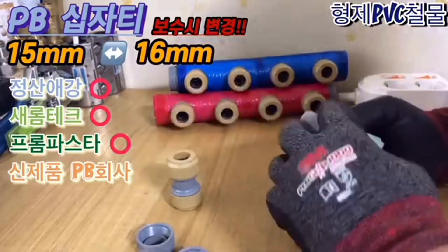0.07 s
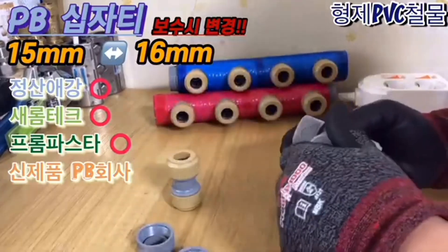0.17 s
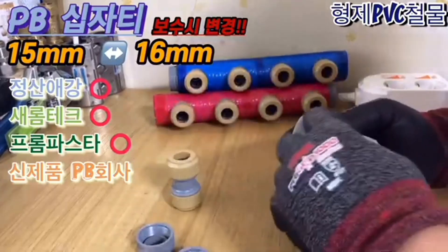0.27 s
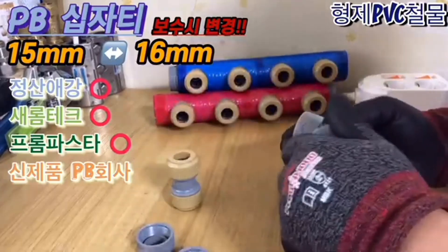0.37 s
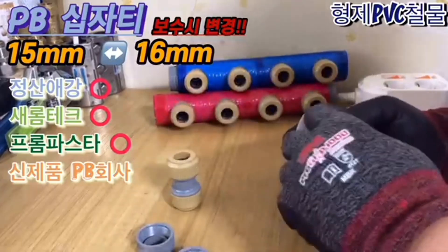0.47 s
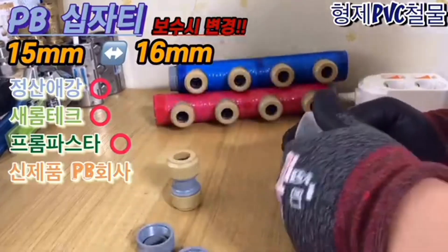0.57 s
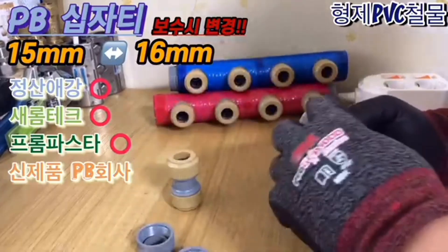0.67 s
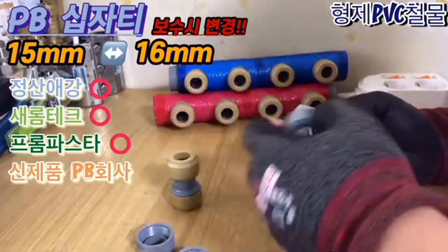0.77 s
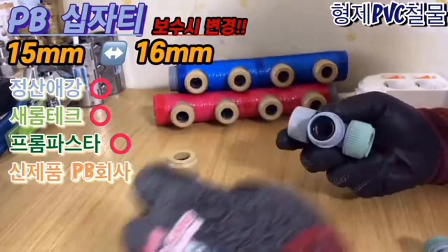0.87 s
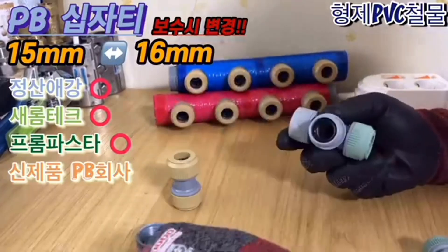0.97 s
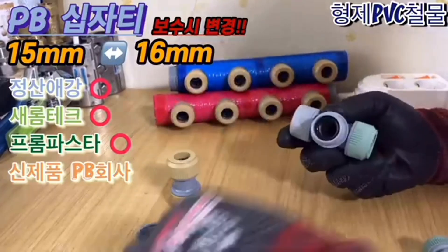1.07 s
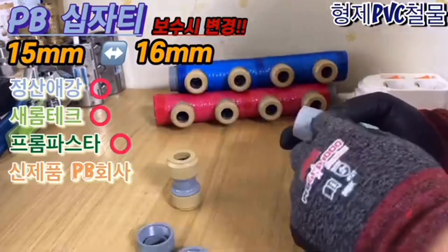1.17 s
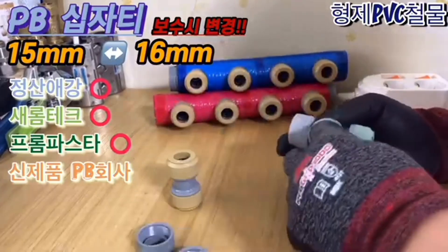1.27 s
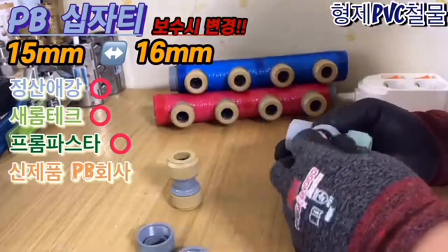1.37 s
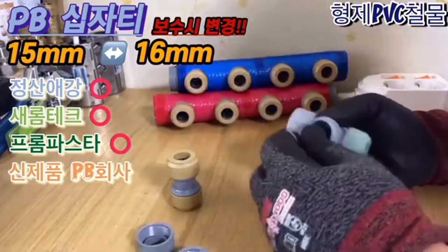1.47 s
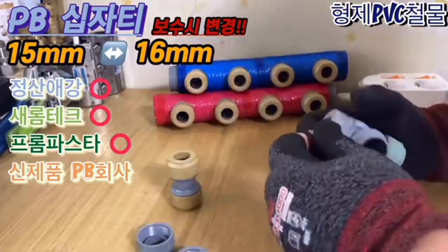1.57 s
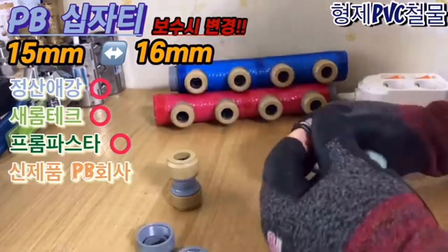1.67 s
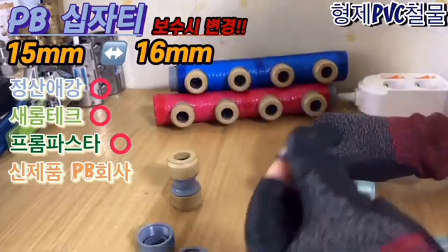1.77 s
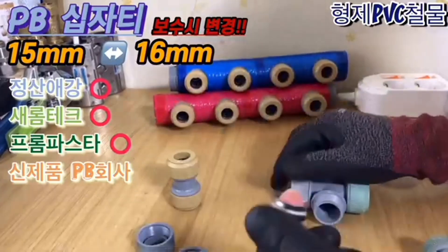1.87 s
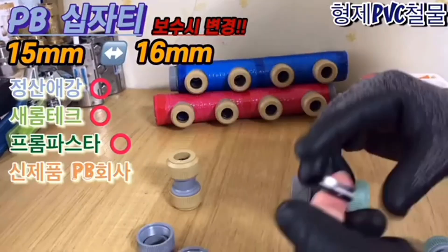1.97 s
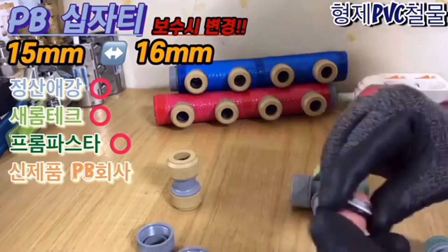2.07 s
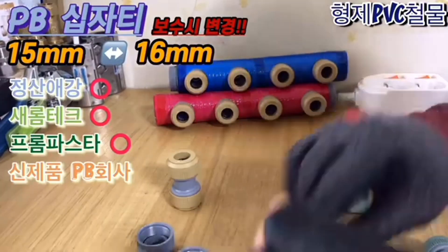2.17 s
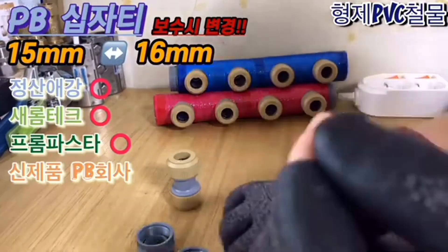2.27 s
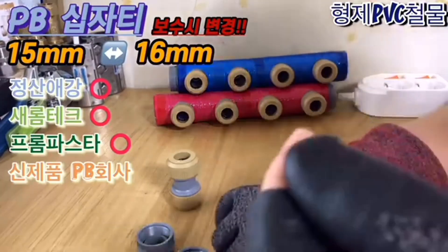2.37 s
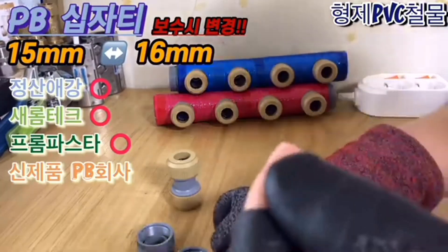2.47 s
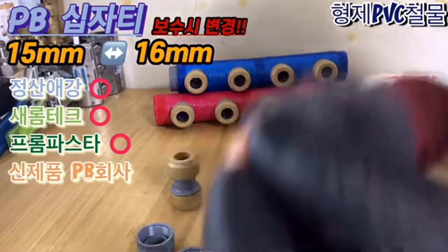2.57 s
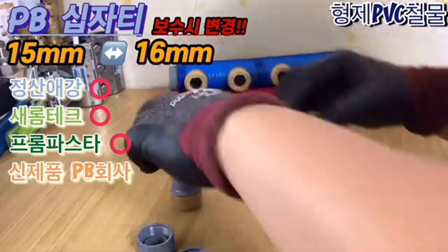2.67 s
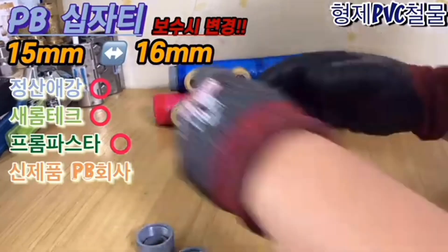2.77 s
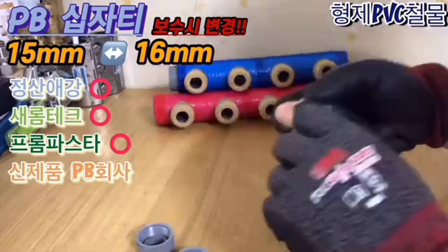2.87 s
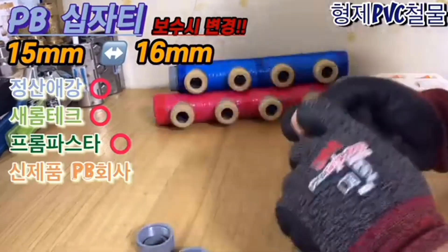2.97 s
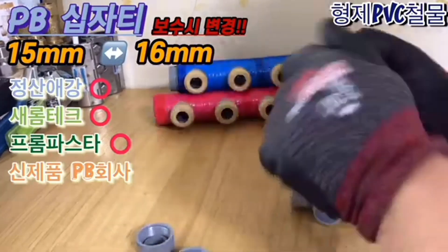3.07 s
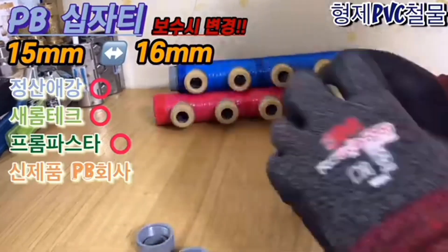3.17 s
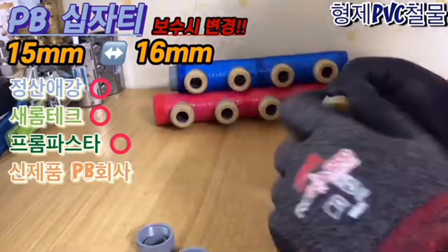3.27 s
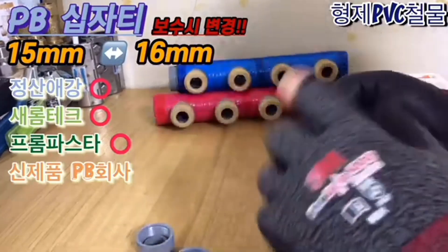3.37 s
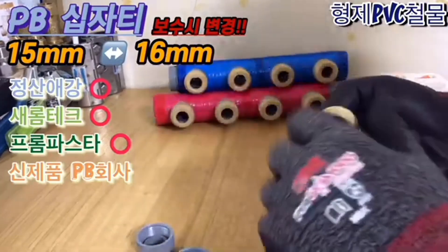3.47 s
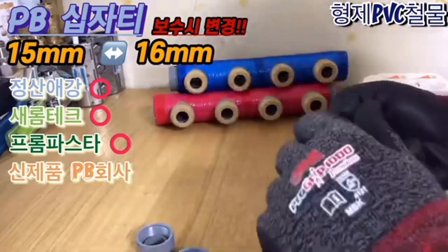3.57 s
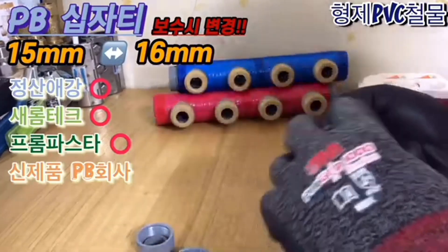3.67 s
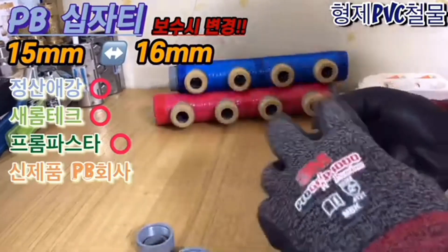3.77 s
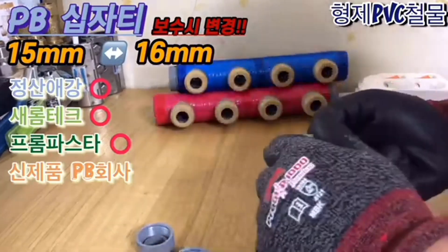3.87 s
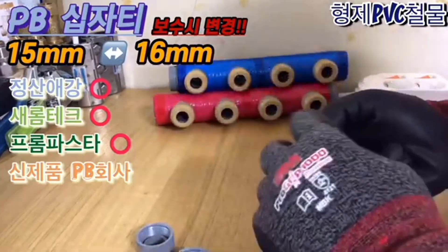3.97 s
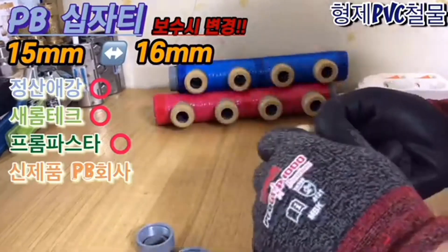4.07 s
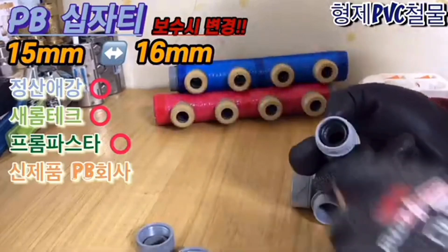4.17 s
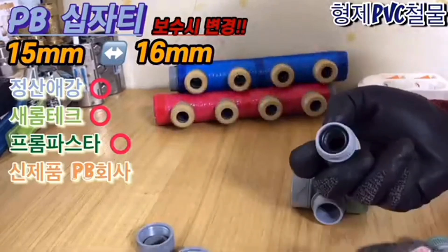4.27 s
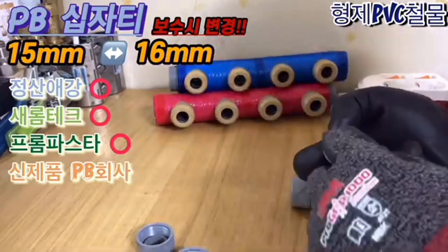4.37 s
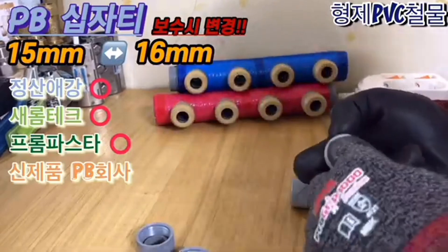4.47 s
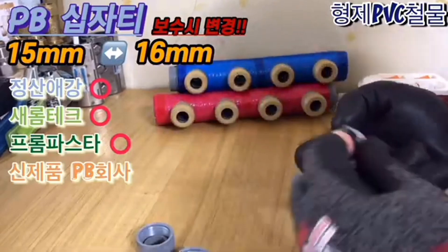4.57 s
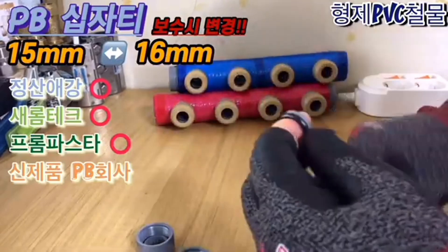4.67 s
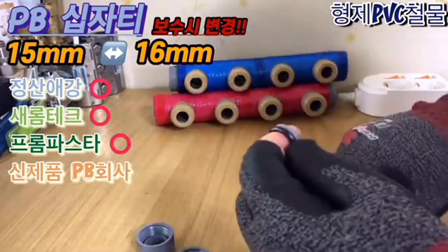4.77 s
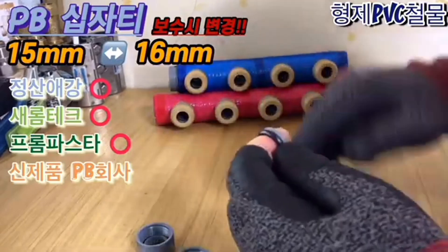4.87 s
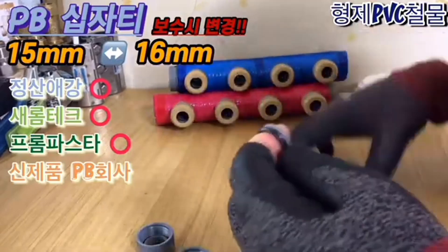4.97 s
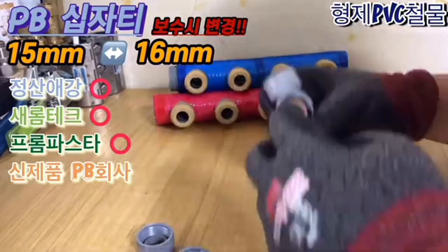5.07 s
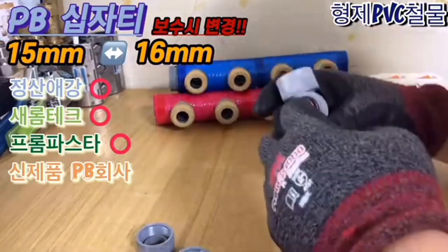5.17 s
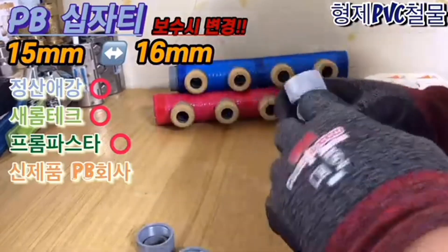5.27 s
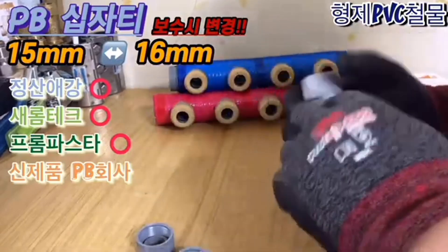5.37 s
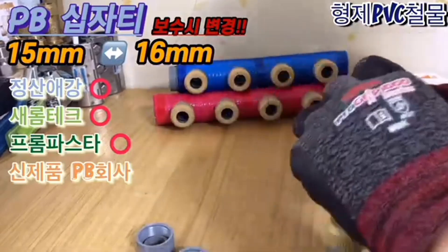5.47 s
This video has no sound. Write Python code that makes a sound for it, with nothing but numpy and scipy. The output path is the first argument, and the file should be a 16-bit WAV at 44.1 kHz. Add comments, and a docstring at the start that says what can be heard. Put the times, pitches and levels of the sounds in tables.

```python
"""Plastic pipe fittings pushed together

Gloved hands push light plastic pipe fittings together over a wooden table in a small room.
Each knock rings the air in the bore and the plastic walls; parts slide on each other with many tiny
contacts. Gloves rustle as filtered grains, and a machine hums softly as noise through resonances.
Echoes and steady room noise fill the rest."""
import sys
import numpy as np
from scipy import signal
from scipy.fft import rfft, irfft
from scipy.io import wavfile

SR = 44100
rng = np.random.default_rng(int(sys.argv[2]) if len(sys.argv) > 2 else 0)


def materialize(psi):
    """Save the field psi as 16-bit PCM at rate SR to the path in sys.argv[1].

    A 1-D psi becomes a single channel; in a 2-D psi each row is a channel.
    """
    bounded = np.clip(np.atleast_2d(psi).T, -1, 1)
    quanta = np.round(bounded * 32767).astype(np.int16)
    wavfile.write(sys.argv[1], SR, quanta)


N = 242991

# strongly damped ways the plastic walls ring: pitch_hz [Hz], level_db [dB],
# t60_s [s to fall by 60 dB; ringing() uses 2 ms or more]
WALLS = [(1560, -25, 0.0041), (1901, -8.5, 0.023), (2300, 0.5, 0.0014), (2940, -3, 0.0075),
         (3474, -2.5, 0.0086), (3830, -0.5, 0.0067), (4620, -4, 0.0084), (5750, 4, 0.0017),
         (6060, 0, 0.006), (6830, 5.5, 0.0019), (8080, 4.5, 0.0011), (9530, 3.5, 0.0018), (10080, 5, 0.003),
         (10920, 2, 0.0013), (12770, -3.5, 0.0035), (14100, -9.5, 0.0015)]

HISS_TOP_HZ = 15000   # no part modes or coloured noise from here up
FIRM_MS = 0.025   # contact time of a firm knock


def knocks():
    """A blow builds up to its main contact, dies in a chatter of small ones, and rings what it hits."""
    # knocks: start_s [s], peak_db [dB], bore_hz [Hz], bore_db [dB], part_hz (touched part) [Hz],
    # part_db [dB], overtone_db [dB], contact_ms [ms], wall_tilt [dB per octave], table_db (thud) [dB]
    knock_rows = [(0.2002, -44.5, 1590, -11, 8190, -9, -15, .03, 14, -27),
                  (.2152, -42.5, 2340, -1, 3080, 0, -9, 0.021, 5.5, -27),
                  (0.5456, -41.5, 1610, -30, 4780, 1, -10, 0.024, 1, -29),
                  (0.9602, -27, 2300, 9, 2800, -3, -12, 0.022, -6, -31),
                  (0.9636, -22.5, 1770, 3, 3170, 10, -20, 0.023, -21, -26),
                  (0.9808, -15.5, 2110, 10, 2830, -14, 0.5, 0.021, -4, -37),
                  (1.0077, -37.5, 2270, 3, 2700, -6, -1, 0.029, -0.5, -31),
                  (1.3796, -45, 2180, -7, 9900, 5, -15, 0.048, 15, -27),
                  (1.5364, -47.5, 1508, -6, 8840, -2, -15, .026, 16, -27),
                  (1.692, -18, 1390, 8.5, 2560, -1, -5, 0.093, 7.5, -21),
                  (1.699, -28.5, 1490, 14, 2600, -6, -15, 0.066, 4, -16.5),
                  (1.776, -18.5, 1430, -1, 2570, 9, -13, 0.061, 2, -29),
                  (1.7971, -13.5, 2190, 7, 3015, 5, 3, 0.035, 3, -16),
                  (1.8009, -13, 1294, 0.5, 2503, 8, -2.5, 0.045, -0.5, -20.5),
                  (1.8027, -21.5, 1800, 5.5, 2430, -18, -20, 0.057, -3.5, -18.5),
                  (2.112, -23, 1590, -2, 2400, 7.5, -14, 0.055, 5.5, -17),
                  (2.1211, -24.5, 1480, -1, 2400, 0, -14, 0.063, -24, -19),
                  (2.168, -27, 1450, 10, 2430, 3, -15, 0.079, 3, -14.5),
                  (2.189, -43, 1560, -1, 2340, 2, -9, 0.042, 4, -27),
                  (2.3092, -46.5, 1520, -5, 7400, -5, -15, .027, 11, -27),
                  (2.4291, -39.5, 1570, 3, 8000, 12.5, -12, 0.016, 7, -27),
                  (2.6725, -28.5, 1630, 3, 2400, 13.5, -9, 0.057, -4, -29),
                  (3.0085, -10.5, 2100, 1.5, 4870, 17, 0, .025, 13, -29),
                  (3.0818, -46.5, 1500, 1, 3690, 3, -9, .03, -1, -33),
                  (3.1808, -26.5, 1710, -18, 3490, 22, -1, 0.0066, 18.5, -27),
                  (3.261, -41, 2160, -5, 2900, 1, 7, 0.027, 8, -27),
                  (3.359, -34, 1650, -10, 3800, 17, -3, 0.016, 15.5, -27),
                  (3.4915, -43, 1530, -8, 3630, 11, -6, 0.017, -1, -27),
                  (3.746, -41, 2330, 1, 3800, 11, -6, .027, 12, -29),
                  (3.9074, -38, 1670, -17, 3840, 2.5, -6, 0.022, 9, -28),
                  (4.2075, -34.5, 1720, 21, 2270, -7, -13, 0.046, 0, -30),
                  (4.2292, -15, 1890, -1, 3280, -2, 7, 0.023, 5.5, -40),
                  (4.2398, -12, 1680, 4.5, 3210, 4, 9.5, 0.026, 9.5, -36),
                  (4.2451, -27, 1530, 1, 2490, 1, -7, 0.035, 7, -35),
                  (4.3393, -46.5, 1450, -8, 4430, 12, -9, 0.044, 0, -29),
                  (4.6438, -11.5, 1716, 7, 2700, -3, -1, 0.046, 5.5, -26.5),
                  (4.6493, -26, 1950, 7, 2590, -18, -5, 0.062, -5, -30),
                  (4.7664, -37.5, 1590, -2, 2550, -7, -9, 0.077, -12, -25),
                  (4.784, -35.5, 2100, -4, 2490, -5, -3.5, 0.04, -3.5, -16.5),
                  (4.9544, -22, 1330, 1.5, 2470, 0.5, -4.5, 0.037, -3, -29),
                  (4.9826, -30.5, 1920, 2, 2780, -6, -9, 0.015, -11, -33),
                  (5.1038, -47.5, 1600, -3, 9600, -2, -17, .027, 17, -31),
                  (5.226, -40, 1630, -3, 4000, 9, -9, .042, 12.5, -25),
                  (5.257, -42.5, 1490, -9, 4170, 21, -6, .021, 12.5, -27)]
    # table top modes: pitch_hz [Hz], level_db [dB], t60_s [s]
    table_modes = [(209, -8, 0.039), (363, 0, 0.047), (477, 5.5, 0.03), (605, 13, 0.0061), (700, 6, 0.033)]
    # modes of the large cross piece: pitch_hz [Hz], level_db [dB], t60_s [s]
    housing_modes = [(813, -4.5, 0.052), (1027, 3.5, 0.011), (1250, -3, 0.022)]
    rise_s, chatter_s, chatter_db = 0.0011, 0.0029, -15   # build-up, decay and level of the chatter
    bore_t60_s, walls_db = 0.01, -6.5
    overtone_ratio = 1.663   # pitch of the touched part's second mode over its first
    housing_db, heavy_db_per_octave = -21, 5.5   # a longer contact shakes the large piece more

    out = np.zeros(N)
    rows = [*knock_rows, *ticks(count=9)]
    chatters = grains((len(rows), 600), 12000, 1.62)
    scatters = rng.standard_normal((len(rows), len(WALLS)))
    table = above(ringing(table_modes, 0), 170)
    housing = above(ringing(housing_modes, 0), 310)
    t = np.arange(600) / SR
    shape = amp(chatter_db) * np.minimum(t / rise_s, np.exp((rise_s - t) / chatter_s))
    for row, chatter, scatter in zip(rows, chatters, scatters):
        start_s, peak_db, bore_hz, bore_db, part_hz, part_db, overtone_db, contact_ms, tilt, table_db = row
        force = chatter * shape
        force[round(rise_s * SR)] = 1   # the main contact
        bore = (bore_hz, bore_db, bore_t60_s)
        parts = [(part_hz, part_db), (overtone_ratio * part_hz, overtone_db)]
        body = fitting(bore, parts, walls_db, tilt, scatter)
        # the blow also reaches the large piece and, through the hands, the table
        contact_octaves = np.log2(max(contact_ms, 0.005) / FIRM_MS)
        heavy = amp(housing_db + heavy_db_per_octave * contact_octaves)
        body = above(body, 0.94 * bore_hz) + heavy * housing + amp(table_db) * table
        sound = signal.fftconvolve(cushioned(force, contact_ms), body)
        add(out, amp(peak_db) * sound / np.abs(sound).max(), start_s)
    return out


def ticks(count):
    """Rows in the knock format for faint ticks of random time, level, bore pitch and part pitch."""
    level_db, spread_db, tilt = -54, 2.5, 5.1   # spread up or down; tilt in dB per octave
    faint_db = -25   # overtone and table thud
    return [(when * N / SR, level_db + spread_db * (2 * loud - 1), 1450 + 800 * bore, -3,
             2300 * 4 ** part, 0, faint_db, FIRM_MS, tilt, faint_db)
            for when, loud, bore, part in rng.random((count, 4))]


def slides():
    """Parts slide or rattle on each other: dense stick-slip contacts under a stroke ring the fitting."""
    # slides: start_s [s], length_s [s], level_db [dB], fade_db (change along the slide) [dB],
    # bore_hz [Hz], part_hz (touched part) [Hz], part_db [dB], contact_ms [ms], walls_db [dB]
    slide_rows = [(0.955, .03, -40.5, 11, 1680, 3170, 4.5, 0.028, -16),
                  (0.981, 0.03, -45, -12, 2120, 3360, 9, 0.03, -8),
                  (1.696, 0.056, -46.5, -27, 1450, 2380, -20, 0.061, -8),
                  (1.759, .027, -52.5, 13, 3300, 7000, -2, 0.021, -7),
                  (1.789, 0.015, -38, -2, 1680, 2620, -20, 0.07, -9),
                  (1.799, 0.014, -30, -49, 1860, 2880, -7, 0.072, -7.5),
                  (1.81, 0.034, -48.5, -10, 1530, 3120, -19, 0.052, -5),
                  (2.089, 0.028, -41, 2, 1620, 2460, -6, 0.056, -8),
                  (2.111, 0.019, -32.5, -4, 1520, 2300, -3.5, 0.077, -8.5),
                  (2.169, 0.056, -52.5, -7, 1570, 2260, -18, 0.22, -15),
                  (2.666, 0.026, -44.5, -11, 1090, 2520, 2, 0.13, -1),
                  (3.01, 0.017, -43, -2, 4570, 9400, 25, .012, 6),
                  (3.027, 0.099, -63, 1, 4770, 9500, 5, 0.0051, 5),
                  (3.148, 0.049, -53, 29, 3660, 9750, 11.5, .0074, -15),
                  (3.26, 0.035, -56.5, 14, 3520, 10000, 20, .01, -10),
                  (3.359, 0.07, -58, 5, 3450, 9500, 8.5, .0069, -9),
                  (3.478, 0.089, -62.5, -13, 3500, 9300, 11, 0.0051, 2),
                  (3.606, 0.079, -62.5, -6, 3540, 6260, -8, 0.0076, 11),
                  (3.752, 0.098, -68.5, -1, 3620, 8800, 11, 0.015, -4),
                  (3.933, 0.058, -62.5, 9, 3780, 9350, -5, 0.009, -2),
                  (4.207, 0.017, -47.5, -10, 1650, 2400, -20, 0.23, -17),
                  (4.243, 0.051, -47.5, -26, 1960, 3180, -13, 0.0073, 2),
                  (4.34, 0.0091, -58.5, -11, 3500, 4650, 3, 0.024, -21),
                  (4.629, 0.024, -42, 9, 1570, 2430, -6, .06, -11),
                  (4.646, .037, -38, -31, 1015, 1610, -9, 0.05, -6),
                  (4.769, 0.062, -54, -20, 1040, 1990, -1, 0.13, 7),
                  (4.966, 0.039, -42.5, -14.5, 1780, 2620, -15, 0.056, -6.5),
                  (5.23, 0.033, -60.5, -11, 3750, 9600, 2, 0.0049, -7)]
    uneven_db, tilt = 3, 2   # roughness of the stroke; tilt of the walls in dB per octave
    low_edge = 0.28   # a slide radiates from this share of its bore pitch upwards

    out = np.zeros(N)
    slips = grains((len(slide_rows), 4000), 3500, 2.8)
    scatters = rng.standard_normal((len(slide_rows), len(WALLS) + 25))
    for row, slip, scatter in zip(slide_rows, slips, scatters):
        start_s, length_s, level_db, fade_db, bore_hz, part_hz, part_db, contact_ms, walls_db = row
        wobble, wall_scatter = scatter[:25], scatter[25:]
        body = fitting((bore_hz, 0, 0.014), [(part_hz, part_db)], walls_db, tilt, wall_scatter)
        fade = amp(fade_db * np.minimum(np.arange(4000) / SR / length_s, 1))
        pushes = slip * fade * stroke(length_s, uneven_db * wobble)
        force = cushioned(pushes, contact_ms)
        sound = signal.fftconvolve(force, above(body, low_edge * bore_hz))
        add(out, at_level(sound, level_db, length_s), start_s)
    return out


def fitting(bore, parts, walls_db, tilt, scatter):
    """Air in the bore, tuned by how parts and fingers close it, plus the touched part and the walls."""
    ring_cycles = 28   # a touched part falls by 60 dB in this many cycles
    octaves = np.log2(np.array(WALLS)[:, 0] / 3000)
    walls = ringing(WALLS, walls_db + tilt * octaves + 2 * scatter)
    part_modes = [(hz, db, ring_cycles / hz) for hz, db in parts if hz < HISS_TOP_HZ]
    return walls + ringing([bore] + part_modes, 0)


def ringing(modes, gains_db):
    """Response to a unit click: decaying sines; neighbouring modes start in opposite directions."""
    t = np.arange(SR // 12)[:, None] / SR
    hz, db, t60_s = np.transpose(modes)
    decay = amp(db + gains_db - 60 * t / np.maximum(t60_s, 0.002))
    rings = decay * np.sin(2 * np.pi * hz * t)
    return rings @ (-1.) ** np.arange(len(hz))


def cushioned(force, contact_ms):
    """A longer contact spreads each push in time and loses its treble."""
    r = np.exp(-1000 / SR / np.clip(contact_ms, 0.005, 1))
    return signal.lfilter([(1 - r) ** 2], [1, -2 * r, r * r], force)


def above(x, hz):
    """A small body radiates little below its lowest modes."""
    return signal.sosfilt(signal.butter(3, hz, "high", fs=SR, output="sos"), x)


def gloves():
    """Knitted fabric rubbing on plastic: many tiny fibre contacts make a rustle and short brushes."""
    return rustle() + brushes()


def rustle():
    """A fine continuous rustle: grains with one fixed colour and a slowly changing level."""
    # level over time: time_s [s], level_db [dB]
    rustle_level = [(0.0, -68), (3.64, -66.5), (4.14, -69), (4.8, -64.5), (5.16, -69), (5.51, -67)]
    # colour of the fabric: pitch_hz [Hz], level_db [dB per Hz]
    glove_colour = [(880, -30), (1500, 7.5), (2750, -1.5), (3430, 1), (3710, -1), (8500, -12.5),
                    (10100, -10.5), (15000, -14)]
    time_s, level_db = np.transpose(rustle_level)
    level = amp(np.interp(np.arange(N) / SR, time_s, level_db))
    return level * coloured(grains(N, 5000, 3.1), glove_colour)


def brushes():
    """Short brushes of a glove: bursts of fibre contacts, each with its own colour."""
    # brushes: start_s [s], length_s [s], level_db [dB], centre_hz [Hz]
    brush_rows = [(0.028, 0.0039, -59, 11000), (0.227, .059, -69.5, 11000), (0.322, 0.017, -70, 4970),
                  (0.453, .058, -70, 8850), (0.675, 0.046, -69.5, 8900), (1.365, 0.032, -63.5, 10000),
                  (1.45, .019, -69.5, 10000), (1.576, 0.098, -67, 4700), (1.73, 0.025, -66, 5860),
                  (1.968, 0.016, -60.5, 5860), (2.664, 0.019, -61, 7000), (2.771, 0.034, -63, 11900),
                  (2.803, 0.092, -71.5, 10000), (3.172, .029, -69, 9800), (3.638, 0.032, -62.5, 10000),
                  (3.777, .021, -63, 9000), (4.336, 0.014, -62, 11100), (4.421, 0.0095, -73, 4370),
                  (4.514, 0.019, -62, 6800), (4.924, 0.1, -65.5, 10000), (4.965, 0.065, -66, 10000),
                  (5.021, .03, -67, 8000), (5.355, 0.05, -70.5, 9800)]
    uneven_db = 4
    octaves_per_khz = 0.18   # a brighter brush has a wider colour

    out = np.zeros(N)
    rows = [*brush_rows, *touches(count=16)]
    hz = np.fft.rfftfreq(4000, 1 / SR) + 1
    fibres = grains((len(rows), 4000), 7000, 1.0)
    wobbles = rng.standard_normal((len(rows), 25))
    for (start_s, length_s, level_db, centre_hz), fibre, wobble in zip(rows, fibres, wobbles):
        width_octaves = octaves_per_khz * centre_hz / 1000
        colour = amp(-6 * (np.log2(hz / centre_hz) / width_octaves) ** 2) * (hz < HISS_TOP_HZ)
        sound = irfft(rfft(fibre) * colour) * stroke(length_s, uneven_db * wobble)
        add(out, at_level(sound, level_db, length_s), start_s)
    return out


def touches(count):
    """Rows in the brush format for faint glove touches of random time, length, level and colour."""
    length_s, level_db, centre_hz = 0.02, -70, 8500   # middle values
    return [(when * N / SR, length_s * (0.5 + long), level_db + 6 * (loud - 0.5),
             centre_hz * 2 ** (pitch - 0.5))
            for when, long, loud, pitch in rng.random((count, 4))]


def stroke(length_s, wobble_db):
    """Pressure of a movement: it starts firmly, eases, swells and fades, unevenly in steps of 3.72 ms."""
    t = np.arange(4000) / SR
    pressure = np.interp(t / length_s, [0, 0.2, 0.6, 1], [0.92, 0.69, 1.0, 0.011])
    return pressure * amp(np.interp(t / 0.00372, np.arange(25), wobble_db))


def grains(shape, per_s, spread_db):
    """Random tiny contacts of uneven size and sign."""
    sizes = amp(spread_db * np.minimum(rng.exponential(1, shape), 4)) * rng.choice([-1, 1], shape)
    return sizes * (rng.random(shape) < per_s / SR)


def room(x):
    """Diffuse dull echoes: a decaying noise tail that builds up until the first reflection time."""
    t60_s, first_echo_s, wall_cut_hz = 0.085, 0.0083, 9800
    t = np.arange(SR // 3) / SR
    build_up = np.clip(t / first_echo_s, 0, 1) ** 2
    tail = rng.standard_normal(len(t)) * amp(-60 * t / t60_s) * build_up
    tail = signal.sosfilt(signal.butter(1, wall_cut_hz, fs=SR, output="sos"), tail)
    return signal.fftconvolve(x, tail / np.sqrt(np.sum(tail ** 2)))[:N]


def hum():
    """A machine in the room: noise passed twice through each resonance of the machine and the room."""
    # resonances: pitch_hz [Hz], width_hz [Hz], level_db [dB rms]
    hum_modes = [(118.8, 7.3, -61), (140.8, 15.8, -58.5), (216.6, 58.5, -66.5), (368, 27, -74.5),
                 (440, 37, -81), (655.4, 104, -69), (801, 145, -72), (1129, 140, -71), (1568, 66, -76.5),
                 (2290, 170, -76.5), (2990, 150, -86.5)]
    out = np.zeros(N)
    for hz, width_hz, level_db in hum_modes:
        # each pass is 1.5 times wider, as two passes narrow the band
        r = np.exp(-np.pi * width_hz * 1.5 / SR)
        section = [1, 0, -1, 1, -2 * r * np.cos(2 * np.pi * hz / SR), r * r]
        noise = rng.standard_normal(N + SR)
        band = signal.sosfilt([section, section], noise)[SR:]   # skip the first second, while it builds up
        out += amp(level_db) * rms_one(band)
    return out


def room_noise():
    """The steady background of the room: random noise with a mostly low-pitched colour."""
    # colour: pitch_hz [Hz], level_db [dB per Hz]
    air_colour = [(18, -53), (30, -30), (136, 5), (195, -6.5), (374, 1), (511, -9), (680, -6.5), (953, -28),
                  (1520, -11), (1920, -42), (2250, -23), (15000, -69)]
    return amp(-63) * coloured(rng.standard_normal(N), air_colour)


def coloured(x, points):
    """Give x a spectrum of (Hz, dB) points and no top above the hiss limit; rms 1."""
    hz = np.fft.rfftfreq(N, 1 / SR) + 1   # + 1 avoids the log of zero
    hz_at, db_at = np.transpose(points)
    gain = amp(np.interp(np.log(hz), np.log(hz_at), db_at)) * (hz < HISS_TOP_HZ)
    return rms_one(irfft(rfft(x) * gain, N))


def amp(db):
    """Turn dB into gain."""
    return 10 ** (np.asarray(db) / 20)


def rms_one(x):
    """Scale to rms 1."""
    return x / np.sqrt(np.mean(x ** 2) + 1e-24)


def at_level(sound, level_db, length_s):
    """Scale so that the energy spread over the length has this rms level."""
    return amp(level_db) * sound / np.sqrt(np.sum(sound ** 2) / (length_s * SR) + 1e-24)


def add(out, x, start_s):
    """Mix x into out from start_s on."""
    i = round(start_s * SR)
    out[i:i + len(x)] += x[:N - i]


def scene():
    """Hands at work, the echoes of the fittings, gloves, hum and room noise."""
    work = knocks() + slides()
    echoes = amp(-18.5) * room(work)
    return (work + echoes + gloves() + hum() + room_noise())[None]


def record(dry):
    """Cut the top steeply at 16.6 kHz."""
    return signal.sosfilt(signal.cheby2(14, 70, 16600, fs=SR, output="sos"), dry)


dry = scene()
out = record(dry)
materialize(out)
```